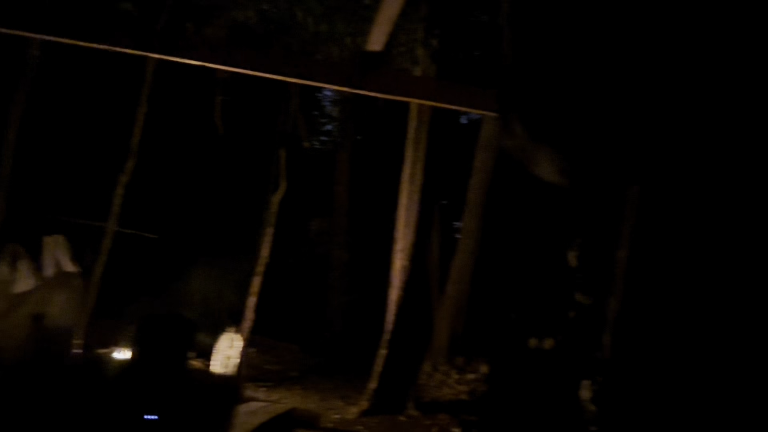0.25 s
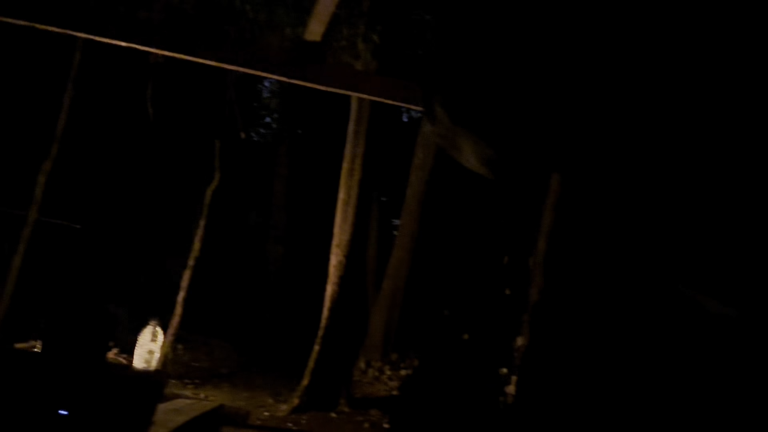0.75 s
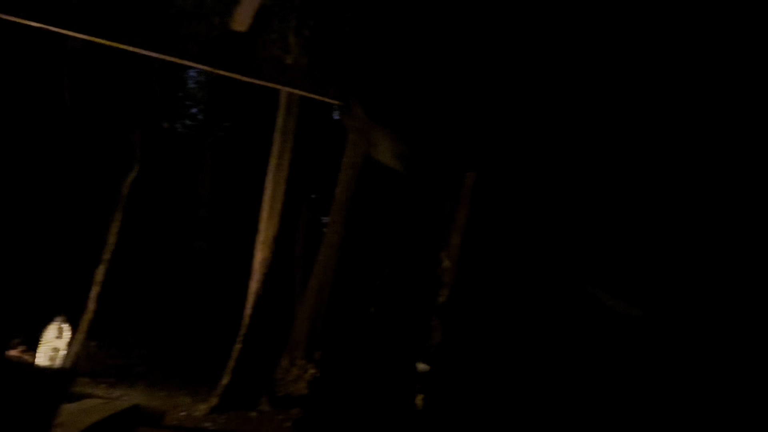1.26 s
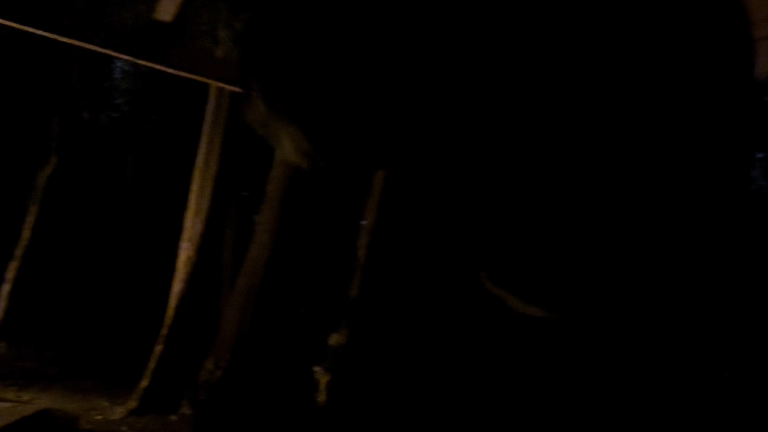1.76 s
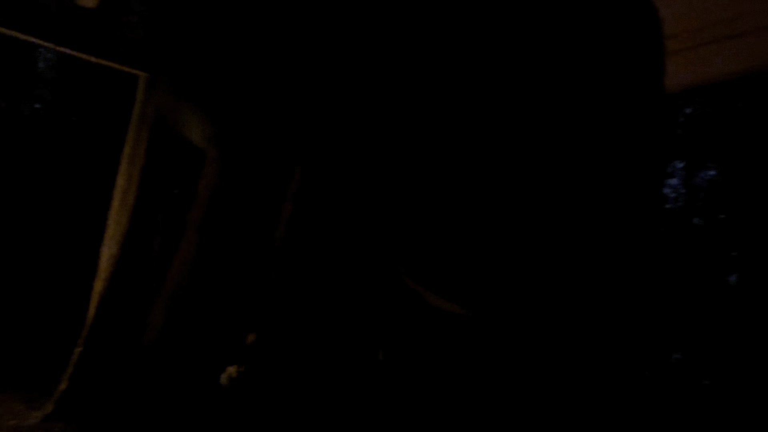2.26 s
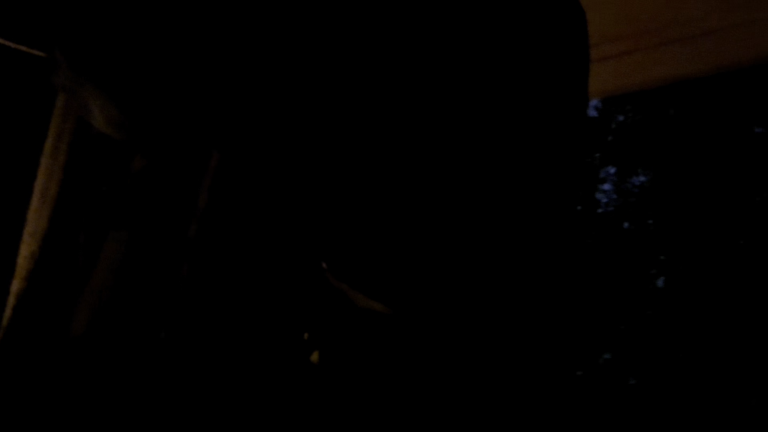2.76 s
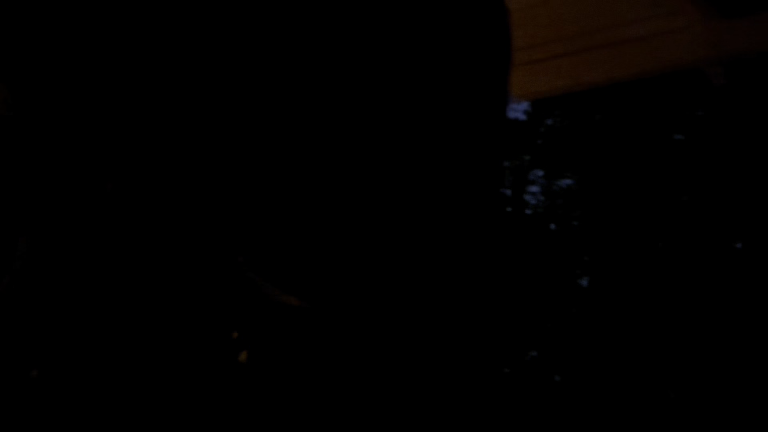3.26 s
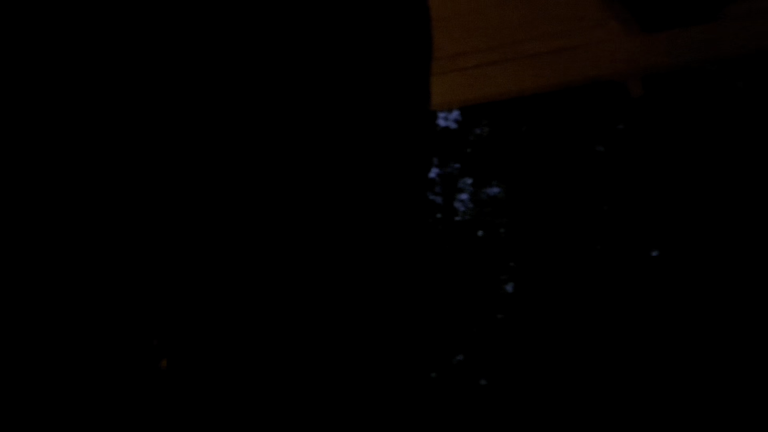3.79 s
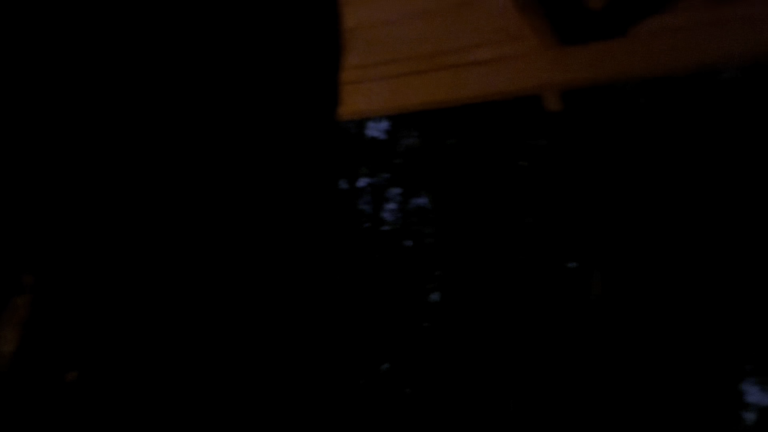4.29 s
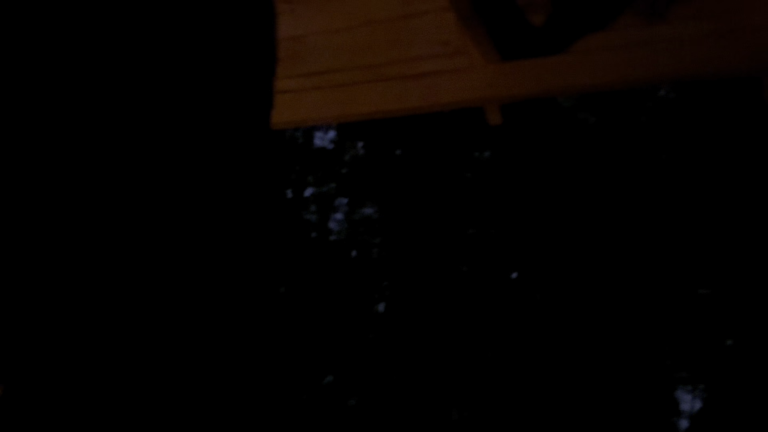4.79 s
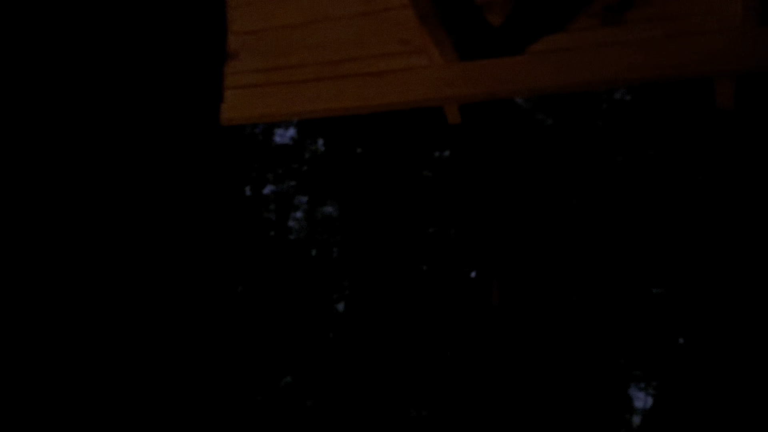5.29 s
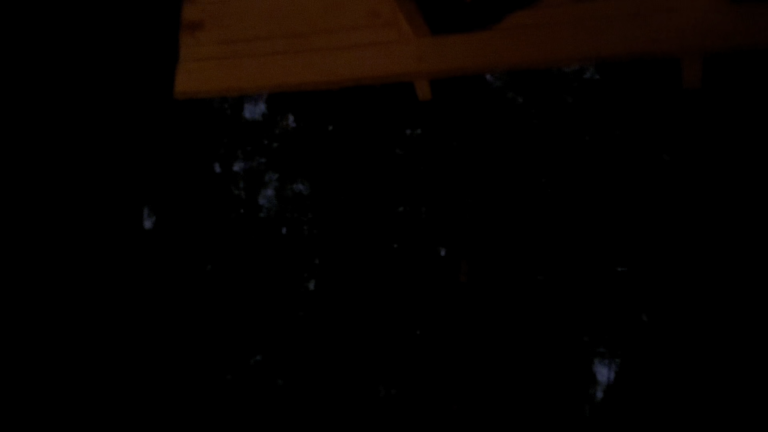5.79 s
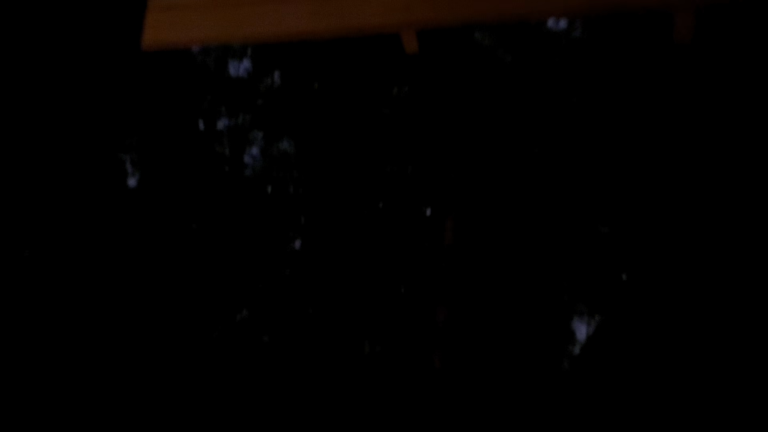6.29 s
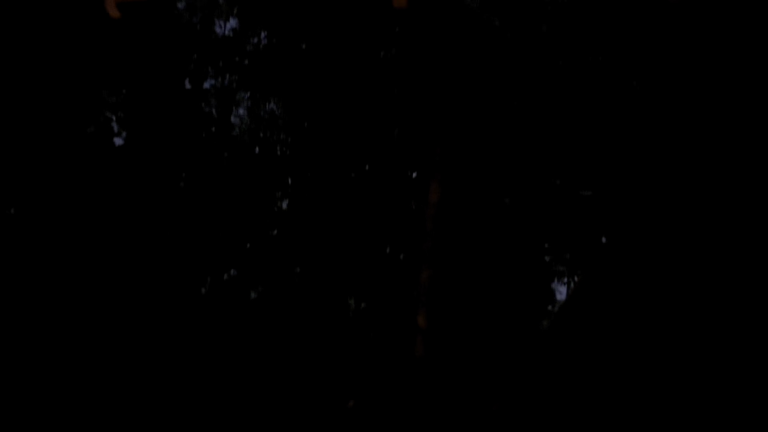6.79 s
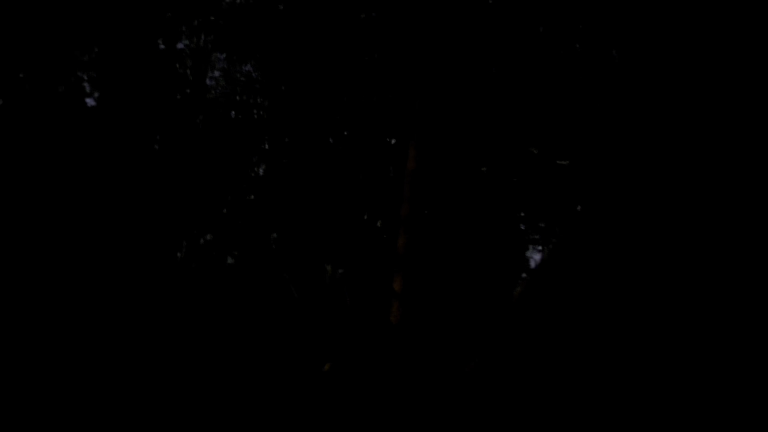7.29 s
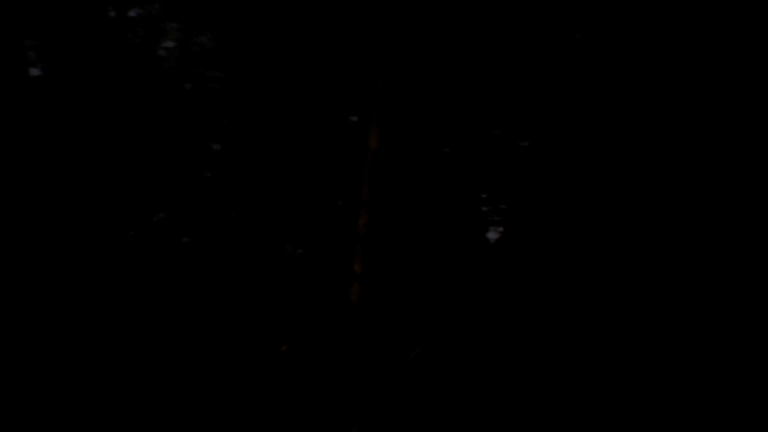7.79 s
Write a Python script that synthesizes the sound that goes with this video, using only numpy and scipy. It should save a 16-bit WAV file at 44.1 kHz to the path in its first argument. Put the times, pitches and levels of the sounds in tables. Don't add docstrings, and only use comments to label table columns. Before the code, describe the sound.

Heard from a wooden porch at night through two close microphone ports: continuous shimmering insects, pulsing crickets and a brief close buzz. An animal's half-second call pushes upward at the start and rings in the forest. Twig and board clicks, faint rustling and low bumps on the microphone follow. Around six seconds the animal starts hooting, faint at first, then stronger and doubled, with trees and a far hill echoing.

```python
import sys
import numpy as np
from scipy import signal
from scipy.fft import rfft, irfft, next_fast_len
from scipy.io import wavfile

SR = 44100
rng = np.random.default_rng(int(sys.argv[2]) if len(sys.argv) > 2 else 0)


def ratio(d):
    e = np.asarray(d, float) / 20
    return 10 ** e


def store_wav(level_fs):
    pcm = np.round(np.clip(np.atleast_2d(level_fs), -1, 1) * 32767)
    wavfile.write(sys.argv[1], SR, pcm.T.astype(np.int16))


N = 354951

# frequency in Hz, level in dB per Hz.
AIR_COLOUR = [(13, -2), (22, -60), (40, -7), (69, -1), (162, -10.5), (209, -8.5), (312, -18.5),
              (511, -22.5), (779, -33.5), (1280, -22.5), (2400, -41), (2970, -31), (4530, -34.5),
              (6000, -41), (7800, -49), (13200, -120)]
# time in seconds, level in dB.
BREEZE = [(0.0, -74), (0.09, -60), (0.52, -59), (0.69, -59), (1.14, -54.5), (1.5, -58.5), (1.82, -59),
          (3.38, -56), (3.74, -54), (4.15, -56.5), (4.48, -53.5), (5.27, -58.5), (5.4, -57.5), (5.78, -58),
          (6.99, -54.5), (7.26, -59.5), (7.62, -53.5), (8.05, -60.5)]
# frequency in Hz, likeness from 0 to 1.
LIKENESS = [(40, 0.78), (290, 0.81), (640, 0.29), (1400, 0.01), (3100, 0.29), (6000, 0.38), (10000, 0.35),
            (12500, 0.86), (15000, 0)]
PORT_LEAD = 1.16

# time in seconds, low singers in dB, high throbbing singers in dB.
CHORUS_SWELL = [(0.0, -56.5, -61), (0.71, -52.5, -60.5), (1.05, -54, -60), (1.32, -52.5, -61.5),
                (1.68, -56.5, -62.5), (1.97, -57, -64.5), (2.29, -50.5, -61.5), (2.49, -54, -59.5),
                (3.03, -53, -60), (3.32, -56.5, -61), (3.83, -55, -59.5), (5.33, -57, -63),
                (5.58, -61, -63), (5.89, -55, -63), (6.17, -55.5, -64), (6.52, -56.5, -61.5),
                (6.99, -55, -60), (8.05, -54.5, -60.5)]
# pitch in Hz, width in Hz, level in dB, flicker in dB,
# lead of the left port in samples, how much louder the left port is in dB.
LOW_SINGERS = [(7327, 82, -8, -1, 1.1, 13.5), (6990, 480, -2, 1.5, 1.37, 0.5)]
HIGH_SINGERS = [(7950, 450, 0.93, 3, 2.87, 1.1), (8290, 340, -0.65, 0.58, 2.1, 0.75)]
WANDERING_SINGERS = [(6884, 120, -3.5, 1, 1.5, 2.6)]
# time in seconds, pitch in Hz.
WANDERING_PITCH = [(0.0, 7080), (2.49, 7070), (2.64, 6880), (3.25, 7210), (4.0, 7060), (4.3, 6950),
                   (4.6, 7060), (5.1, 7080), (5.35, 6960), (6.86, 7020), (7.04, 7150), (8.05, 6940)]
# time in seconds, throbs counted so far.
THROBS = [(0, -.1), (1, 4.2), (2.25, 9.15), (3, 12.45), (5.05, 21.38), (5.55, 23.82), (7.25, 31),
          (8.05, 34.45)]

CRICKET_HZ = [7520, 6750, 6870, 6430]
# (start in seconds, length in seconds).
CRICKETS = [(98, -54.5, 1.82, [(.05, 0.24), (1.05, 0.26), (2.04, 0.2), (3.0, 0.28), (4.38, 0.097),
            (5.04, 0.28), (6.0, 0.25), (6.94, 0.16), (7.93, 0.22)]), (36, -62.5, 0.67, [(.85, 0.18),
            (2.62, 0.18), (3.93, 0.33), (5.7, 0.39), (7.6, 0.17)]), (37, -60, 1.3, [(.68, 0.21),
            (2.55, 0.2)]), (325, -65, 1.2, [(2.1, 0.8), (3.55, 0.85), (5.0, 0.92), (5.8, 0.81),
            (6.5, 0.53)])]
# time in seconds, centre in Hz, level in dB.
BUZZ = [
    (0.9, 10200, -83),
    (0.946, 9000, -73),
    (1.026, 10650, -48),
    (1.118, 10870, -48.5),
    (1.508, 10800, -77.5),
    (1.56, 9850, -73),
]
CHIRP_HZ = 4655
# start in seconds, length in seconds, pitch in Hz, width in Hz,
# level in dB.
CHIRPS = [(3.015, .04, CHIRP_HZ, 20, -59), (2.99, .175, 4645, 20, -66), (3.15, .05, 4630, 20, -71),
          (3.2, .05, CHIRP_HZ, 20, -69), (7.144, .16, CHIRP_HZ, 70, -73), (7.4, .071, 4600, 80, -72),
          (7.79, .03, 4630, 30, -70), (7.822, .036, 4630, 20, -61), (7.858, .058, 4630, 20, -63),
          (7.9, .15, 4630, 40, -69), (7.8, .17, 4280, 200, -70), (.48, .95, 12400, 280, -66)]

# peak time in seconds, rise in seconds, fall in seconds (ten dB each),
# bright hiss in dB, dull hiss in dB.
BRUSHES = [(.24, 0.06, 0.049, -57.5, -74), (.55, 0.37, .9, -64, -65), (1.14, 0.25, 0.23, -57, -61.5),
           (1.21, 0.098, 0.093, -59, -60), (1.68, 0.095, 0.043, -61.5, -65), (2.04, 0.061, .05, -65.5, -77),
           (2.257, 0.0023, 0.027, -38, -68), (2.54, 0.12, .05, -69, -68), (2.82, 0.1, 0.056, -63.5, -67),
           (3.08, 0.22, 0.49, -66, -69), (3.31, 0.068, 0.057, -63.5, -69),
           (3.74, 0.011, 0.0096, -48.5, -72), (3.8, 0.059, 0.25, -63, -75), (4.22, 0.47, .05, -66, -70),
           (4.999, 0.11, 0.073, -64, -77), (5.52, 0.016, 0.0066, -44.5, -65),
           (5.56, .03, 0.052, -56, -65.5), (6.18, 0.056, 0.31, -56, -65.5), (6.41, 0.093, 0.12, -61, -64.5),
           (6.74, 0.07, 0.13, -58, -64), (7.4, 0.057, 0.12, -63.5, -66.5), (7.6, 0.046, 0.41, -65.5, -69.5),
           (7.84, 0.046, 0.22, -69, -66.5)]
# frequency in Hz, level in dB per Hz.
BRIGHT_COLOUR = [(5180, 0), (8800, 8), (9460, 13), (10100, 13.5), (11100, 6), (14400, 8), (15600, 9)]
DULL_COLOUR = [(500, 8.5), (1200, 2.5), (2500, -1), (4500, 0.5), (7000, -2), (12000, -27)]
# time in seconds, peak in dB, colour in Hz, time to die by 60 dB
# in seconds, tilt in dB per octave.
CLICKS = [(1.6397, -36, 2220, 0.12, 1), (1.68, -57, 2860, 0.15, 9), (1.888, -30.5, 2500, 0.14, 3),
          (2.2522, -22, 2510, 0.18, 2.5), (2.2588, -20, 3650, 0.11, 8), (2.2612, -26.5, 2340, 0.38, 7.5),
          (2.4939, -35.5, 2700, 0.18, 2), (2.8043, -47, 3540, 0.15, 11), (3.218, -41.5, 1800, 0.18, -2),
          (3.7336, -35.5, 4330, 0.26, 5.5), (3.94, -39, 4060, 0.28, 17), (4.065, -39, 1100, 0.044, 1.5),
          (4.15, -45, 5500, .06, 4), (4.431, -48, 2500, .05, -1), (5.099, -49, 1500, .05, -4),
          (5.496, -42, 5330, 0.5, 7), (5.51, -44.5, 3020, 0.44, 11), (7.581, -39.5, 2380, 0.31, 2.5),
          (7.644, -34.5, 2290, 0.25, 0)]
# frequency in Hz, level in dB per Hz.
CLICK_COLOUR = [(88, -30), (150, 8), (583, 8), (966, -4), (1130, -0.5), (1570, -0.5), (4840, -11.5),
                (6470, -12.5), (15500, -41)]
# time in seconds, peak in dB, pitch in Hz, time to die by 60 dB in seconds.
TICKS = [
    (7.582, -49, 2480, .04),
    (7.6435, -40, 2550, 0.015),
]
# time in seconds, peak in dB, pitch in Hz.
THUMPS = [(0.468, -41, 71), (0.83, -36, 90), (0.989, -28, 91.3), (1.239, -35, 82.5), (1.767, -37, 58),
          (2.239, -52, 206), (2.703, -36.5, 56.7), (2.991, -33.5, 70.5), (3.388, -45, 53.6),
          (4.302, -36, 65.6), (5.244, -41, 70.4), (5.514, -38.5, 63.4),
          (0.983, -31.5, 172), (1.067, -32, 194), (1.239, -38.5, 188), (1.594, -38.5, 233),
          (2.248, -29, 202), (2.524, -38, 194), (3.409, -37, 186), (7.765, -43, 177), (7.903, -41, 186)]

# frequency in Hz, level in dB.
THROAT = [(350, -12), (480, -1), (630, -15), (770, -10.5), (880, 3.5), (1250, 2.5), (1550, -3.5),
          (1900, -37.5), (2280, -24), (3150, -43), (3770, -44), (3880, -21.5), (4500, -35.5), (5050, -35),
          (6080, -47), (7200, -57)]
# frequency in Hz, width in Hz, level in dB.
BREATH = [(3920, 230, -26.5), (5990, 230, -28)]
# time in seconds, pitch in Hz, second harmonic in dB, sent into the trees in dB.
CALL = [
    (0.173, 620, -57, -22),
    (0.208, 620.6, -37, -17),
    (0.324, 634.7, -27, -9),
    (0.399, 646, -29.5, -13),
    (.46, 643.6, -30, -4),
    (0.509, 671.7, -32, 8.5),
    (0.55, 753, -31, -0.5),
    (0.642, 757.6, -27.5, -17),
    (.665, 565, -47, -1),
]
# time in seconds, width in seconds, depth in dB.
DIPS = [(.219, .008, 12), (.264, 0.0075, 13), (0.322, 0.0058, 19), (0.374, 0.016, 20), (0.417, 0.018, 9),
        (0.434, 0.0024, 18), (0.465, 0.008, 19), (0.5, 0.0088, 7), (0.66, 0.0073, 1)]
# time in seconds, pitch in Hz, level in dB, share heard straight in dB.
HOOTS = [
    (5.98, 466, -60, -20),
    (6.17, 485, -58.5, -11),
    (6.375, 505, -59, -4),
    (6.568, 552, -48.5, -3),
    (6.77, 561, -43.5, -0.5),
    (6.962, 563.8, -38.5, 0),
    (7.18, 566.5, -38.5, 1.5),
    (7.395, 564.3, -39, -0.5),
    (7.615, 574.6, -37.5, -4),
    (7.835, 575.5, -36, -5.5),
]
# time in seconds, pitch in Hz, level in dB,
# share heard straight in dB.
LEAD_NOTES = [
    (7.14, 602, -43.5, -7),
    (7.344, 600, -38.5, -4),
    (7.563, 607, -34.5, -2),
    (7.785, 608, -35, 0.5),
    (8.005, 614.4, -35.5, 0.5),
]


def rms_one(x):
    return x / np.sqrt(np.mean(x ** 2) + 1e-20)


def in_time(rows):
    s, *columns = np.transpose(rows)
    return [np.interp(np.arange(N) / SR, s, c) for c in columns]


def at_hz(points, hz):
    p = np.array(points)
    return np.interp(np.log(hz + 1), np.log(p[:, 0]), p[:, 1])


def drift(rate):
    r = np.exp(-80 * np.pi * rate / SR)
    slow = signal.lfilter([1], [1, -2 * r, r * r], rng.standard_normal(N // 40 + 2002))[2000:]
    return np.interp(np.arange(N) / 40, np.arange(len(slow)), rms_one(slow))


def grainy(depth_db, rate):
    return rms_one(ratio(depth_db * drift(rate)))


def swell(start, length, rise=0.02):
    out, i = np.zeros(N + SR), round(start * SR)
    u = np.linspace(0, 1, round(length * SR))
    edge = np.clip(np.minimum(u, 1 - u) / rise, 0, 1)
    out[i:i + len(u)] = np.sin(np.pi / 2 * edge) ** 2
    return out[:N]


def filtered(x, order, hz, kind="low"):
    return signal.sosfilt(signal.butter(order, hz, kind, fs=SR, output="sos"), x)


def resonance(x, hz, width_hz):
    r = np.exp(-np.pi * width_hz / SR)
    row = [1, 0, -1, 1, -2 * r * np.cos(2 * np.pi * hz / SR), r * r]
    return rms_one(signal.sosfilt([row, row], x))


def pan(x, left_db):
    return x * ratio(np.array([[.5], [-.5]]) * left_db)


def lagged(x, lead):
    size = next_fast_len(N)
    delay = np.exp(-2j * np.pi * lead * np.arange(size // 2 + 1) / size)
    return np.array([x, irfft(rfft(x, size) * delay, size)[:N]])


def coloured(spectrum, size=N, lead=0):
    hz = np.arange(size // 2 + 1) * SR / size
    mid, side = rfft(rng.standard_normal((2, size)))
    alike = np.clip(at_hz(LIKENESS, hz), 0, 1)
    pair = np.sqrt(1 + alike) * mid + np.sqrt(1 - alike) * side * [[1], [-1]]
    pair[1] *= np.exp(-2j * np.pi * lead * hz / SR)
    return rms_one(irfft(pair * ratio(at_hz(spectrum, hz)), size))


def air():
    colour = [(12.0, -66)] + AIR_COLOUR + [(9000, -49), (16000, -69)]
    noise = coloured(colour, size=next_fast_len(N), lead=PORT_LEAD)[:, :N]
    rumble = filtered(noise, 2, 300)
    gusts = rms_one(ratio(in_time(BREEZE)[0])) * grainy(3.8, 11.5)
    return ratio(-52) * (noise + rumble * (gusts - 1))


def singers(table, scattered_db):
    out = 0
    for hz, width_hz, level_db, flicker_db, lead, left_db in table:
        scrapes = (rng.random((3, N)) < .08) * rng.standard_normal((3, N))
        rung = resonance(scrapes, hz, width_hz)
        both = lagged(rung[0], lead) + ratio(scattered_db) * rung[1:]
        flicker = 0.13 * drift(0.27) + 0.71 * drift(7.4)
        out = out + pan(both, left_db) * ratio(level_db + flicker_db * flicker)
    return out


def chorus():
    low_db, high_db = in_time(CHORUS_SWELL)
    lull = np.sin(np.pi * in_time(THROBS)[0]) ** 2
    throb_db, throb_sharpness = 3.5, 1.8
    shift_hz = in_time(WANDERING_PITCH)[0] - WANDERING_SINGERS[0][0]
    shift = np.exp(2j * np.pi * np.cumsum(shift_hz) / SR)
    loudest = singers(WANDERING_SINGERS, scattered_db=-7)
    loudest = np.real(signal.hilbert(loudest, next_fast_len(N))[:, :N] * shift)
    low = singers(LOW_SINGERS, scattered_db=-4.5) + loudest
    high = filtered(singers(HIGH_SINGERS, scattered_db=-4.0), 6, 8750)
    high_db = high_db + 6.5 - throb_db * lull ** throb_sharpness
    return ratio(low_db - 2.1) * low + ratio(high_db) * high


def crickets():
    out = 0
    for hz, (width_hz, db, lead, phrases) in zip(CRICKET_HZ, CRICKETS):
        song = resonance(rng.standard_normal(N), hz, width_hz)
        song = song * sum(swell(s, length, rise=0.17) for s, length in phrases)
        out = out + pan(lagged(ratio(db) * song, lead), 2.0)
    return out


def buzz():
    before = [(0, BUZZ[0][1], -120), (.86, BUZZ[0][1], -92)]
    centre_hz, level_db = in_time(before + BUZZ + [(1.65, BUZZ[-1][1], -120)])
    noise = rng.standard_normal((3, N))
    noise = noise[0] + ratio(-4) * noise[1:]
    out = 0
    for hz in np.arange(9200, 11700, 300):
        above = (hz - centre_hz) / 600
        band_db = np.where(above > 0, -9 * above ** 2, 5.2 * above)
        out = out + resonance(noise, hz, 213.5) * ratio(band_db)
    return ratio(level_db + 1.5) * grainy(0.41, 60) * out


def chirps():
    noise = rng.standard_normal((3, N))
    noise = noise[0] + ratio(-19.0) * noise[1:]
    t = np.arange(N) / SR
    wobble_hz, rise_share = 14.6, 0.28
    waver = 2 * np.pi * np.cumsum(wobble_hz * drift(14.8)) / SR
    out = 0
    for s, length, hz, width_hz, db in CHIRPS:
        rough = resonance(noise, hz, width_hz)
        if width_hz < 35:
            song = 2.2 * np.sin(2 * np.pi * hz * t + waver) + 0.53 * rough
        else:
            song = 1.2 * rough
        rise = rise_share if length < .1 else rise_share / 2
        out = out + ratio(db) * swell(s, length, rise=rise) * song
    return out


def rustle():
    t = np.arange(0, N + 32, 32) / SR
    rest_wander = np.interp(t * SR, np.arange(N), drift(9.1))
    bright_gain = ratio(-72 - 1.5 * rest_wander)
    dull_gain = ratio(-72.5)
    for s, rise, fall, bright_db, dull_db in BRUSHES:
        brush = ratio(-10 * np.maximum((s - t) / rise, (t - s) / fall))
        bright_gain = np.maximum(bright_gain, ratio(bright_db) * brush)
        dull_gain = np.maximum(dull_gain, ratio(dull_db) * brush)
    bright_gain, dull_gain = in_time(np.transpose([t, bright_gain, dull_gain]))
    size = next_fast_len(N)
    bright = coloured([(3000, -23), (7000, -7)] + BRIGHT_COLOUR, size=size)[:, :N]
    dull = coloured([(100, -2)] + DULL_COLOUR, size=size, lead=PORT_LEAD)[:, :N]
    bright = ratio(3.0) * bright_gain * grainy(2.1, 100) * bright
    dull = ratio(10.5) * dull_gain * grainy(1.0, 40) * dull
    return bright + dull


def clicks():
    out, size = np.zeros((2, N + SR)), SR // 2
    t = np.arange(size) / SR
    for s, db, hz, t60, tilt_db in CLICKS:
        colour = [(f, level + tilt_db * np.log2(f / 3000)) for f, level in CLICK_COLOUR]
        hiss = coloured(colour, size=size, lead=PORT_LEAD)
        body = 0.3 * resonance(hiss, hz, 1600) + 0.79 * hiss
        crack = ratio(-60 * t / 0.013)
        tail = ratio(-3.0 - 60 * t / max(t60, .02))
        i = round(s * SR)
        out[:, i:i + size] += ratio(db - 9.5) * body * (crack + tail)
    for s, db, hz, t60 in TICKS:
        i = round(s * SR)
        attack = np.minimum(t / 0.0014, 1)
        out[:, i:i + size] += ratio(db - 60 * t / t60) * np.sin(2 * np.pi * hz * t) * attack
    return out[:, :N]


def thumps():
    out, t = np.zeros(N + SR), np.arange(SR // 4) / SR
    attack = np.minimum(t / 0.003, 1)
    for s, db, hz in THUMPS:
        i = round(s * SR)
        fading = ratio(db - 5.0 - 60 * t * hz / 16.4)
        out[i:i + len(t)] += fading * np.sin(2 * np.pi * hz * t) * attack
    return out[:N]


def forest(call, hoots):
    near_t60_s, hill_t60_s = 0.41, 1.3
    treeline_s, clearing_s = 0.0015, 0.14
    t = np.arange(2 * SR) / SR
    near, far = rng.standard_normal((2, 2, 2 * SR))
    far = rms_one(filtered(far, 2, 2600))
    clumps = rms_one(filtered(near[0], 2, 9.0))
    near = ratio(-60 * t / near_t60_s - 2.7 * (t / clearing_s) ** 4) * near
    far = ratio(-13 - 60 * t / hill_t60_s + 3 * clumps) * far
    build = np.minimum(t / treeline_s, 1) ** 0.2
    out = 0
    for x, far_db in ((call, 0), (hoots, -5.5)):
        echoes = build * (near + ratio(far_db) * far)
        side = filtered(echoes[0] - echoes[1], 1, 490, "high")
        echoes = (echoes[0] + echoes[1] + side * [[1], [-1]]) / 2
        echoes = echoes / np.sqrt(np.sum(echoes ** 2) / 2)
        out = out + signal.oaconvolve(x[None], echoes, axes=1)[:, :N]
    return ratio(2) * out


def voice(pitch_hz, effort_db, first_db):
    size = len(pitch_hz)
    phase = 2 * np.pi * np.cumsum(pitch_hz) / SR
    patch_s, patchy_db = 0.0318, 3
    knots = np.arange(0, size + SR * patch_s, SR * patch_s)
    chances = rng.standard_normal((10, 100))
    patches = [patchy_db * np.interp(np.arange(size), knots, row[:len(knots)]) for row in chances]
    strong, weak = 0, 0
    for k in (1, 2):
        strong = strong + ratio(at_hz(THROAT, k * pitch_hz) + first_db * (k == 1)) * np.sin(k * phase)
    for k in range(3, 10):
        throat_db = np.minimum(at_hz(THROAT, k * pitch_hz), -20)
        weak = weak + ratio(throat_db + patches[k]) * np.sin(k * phase)
    whistle = ratio(-34) * np.sin(16 * phase) + ratio(-33.5) * np.sin(17 * phase)
    return np.sqrt(2) * (strong + ratio(effort_db) * weak + whistle * (pitch_hz < 660))


def long_call():
    rows = [(.15, CALL[0][1], -100, 0.0052)] + CALL + [(.72, CALL[-1][1], -130, 0)]
    pitch_hz, level_db, sent_db = [column[:SR] for column in in_time(rows)]
    t = np.arange(SR) / SR
    push_hz = pitch_hz - CALL[0][1]
    push = push_hz / push_hz.max()
    dip_db = sum(db * np.exp(-((t - s) / width) ** 2) for s, width, db in DIPS)
    break_db = 36 * np.exp(-((t - 0.334) / 0.017) ** 2)
    level_db = level_db - dip_db
    pitch_hz = pitch_hz * (1 + 0.0087 * push * drift(41.0)[:SR])
    rasp_db = push * drift(150)[:SR]
    effort_db = -2 + 0.0114 * push_hz + rasp_db
    first_db = dip_db - break_db + 0.5 - 0.048 * push_hz
    call = ratio(level_db) * voice(pitch_hz, effort_db, first_db)
    hiss = sum(ratio(db) * resonance(rng.standard_normal(SR), hz, width_hz) for hz, width_hz, db in BREATH)
    call = call + ratio(level_db) * np.clip(push, 0, 1) ** 1.6 * hiss
    rest = (0, N - SR)
    call = np.pad(call, rest)
    return call, np.pad(ratio(sent_db), rest) * call


def hoots():
    straight, sent = np.zeros((2, N + SR))
    hoot_s, lead_s, scoop = .064, 0.054, 0.13
    # notes, length in s, share of pitch lost at the end, aim at the trees in dB
    kinds = ((HOOTS, hoot_s, 0.695, 0), (LEAD_NOTES, lead_s, 0.24, -3.5))
    for notes, length, fall, aim_db in kinds:
        u = np.linspace(0, 1, round(length * SR))
        sag = 1 - 1.323 * fall * np.clip(2.2 * u - 1.2, 0, 1) ** 1.675
        sag = sag - scoop * np.clip(1 - 4.3 * u, 0, 1)
        shape = np.sin(np.pi * u ** 1.8) ** 0.47
        turned_away = np.clip(1 - 16 * fall * (u - .55), .05, 1)
        sent_gain = ratio(aim_db - 31.0 * fall * np.clip(u - .55, 0, 1))
        for s, hz, db, straight_db in notes:
            i = round(s * SR)
            note = ratio(db) * shape * voice(hz * sag, -11.5, -22 + 24 * u)
            straight[i:i + len(u)] += ratio(straight_db) * note * turned_away
            sent[i:i + len(u)] += note * sent_gain
    hum_s = 0.035
    t = np.arange(round(hum_s * SR)) / SR
    for s, hz, db, _ in LEAD_NOTES:
        i = round((s + 0.45 * lead_s) * SR)
        hum = ratio(db - 21) * np.sin(np.pi * t / hum_s) * np.sin(2 * np.pi * hz * t)
        straight[i:i + len(t)] += hum
        sent[i:i + len(t)] += ratio(14.0) * hum
    return straight[:N], sent[:N]


def animal():
    call, call_sent = long_call()
    hoot, hoot_sent = hoots()
    straight = pan(ratio(-3.5) * call, -6.3) + pan(hoot, -7.5)
    return straight + forest(call_sent, ratio(-4.5) * hoot_sent)


def scene():
    insects = chorus() + crickets() + buzz() + chirps()
    nearby = rustle() + clicks() + thumps()
    return air() + insects + nearby + animal()


def roll_off(x):
    return signal.sosfilt(signal.butter(12, 15750, fs=SR, output="sos"), x)


def record(dry):
    return roll_off(dry)


dry = scene()
out = record(dry)
store_wav(out)
```